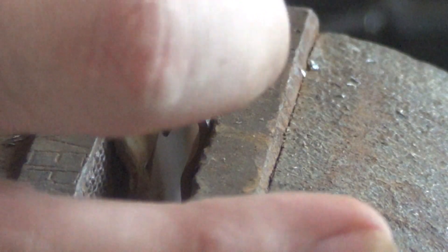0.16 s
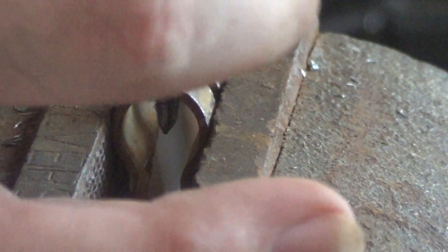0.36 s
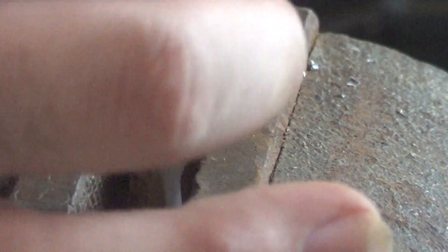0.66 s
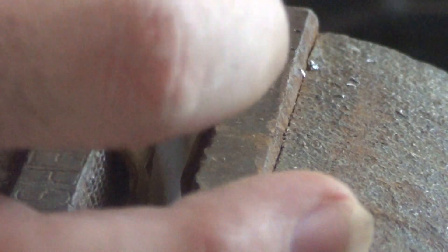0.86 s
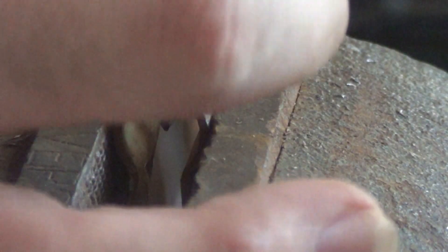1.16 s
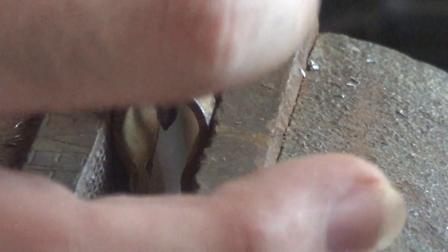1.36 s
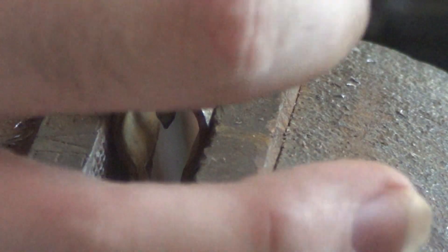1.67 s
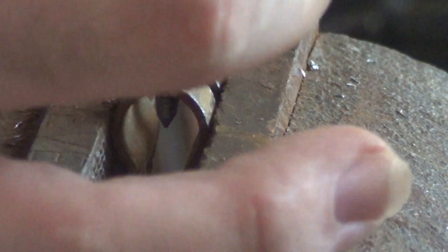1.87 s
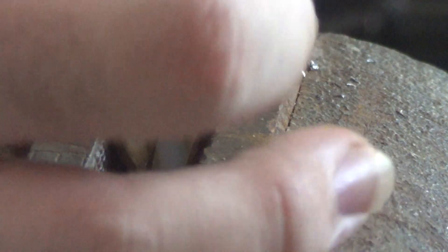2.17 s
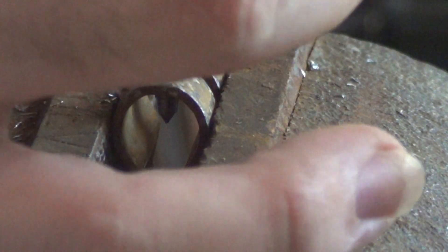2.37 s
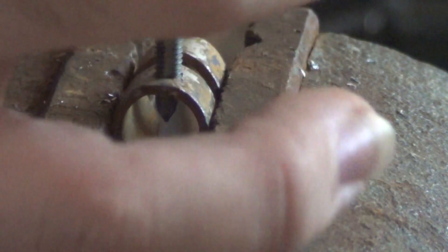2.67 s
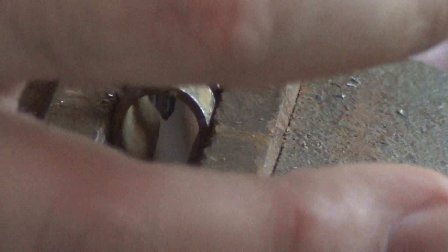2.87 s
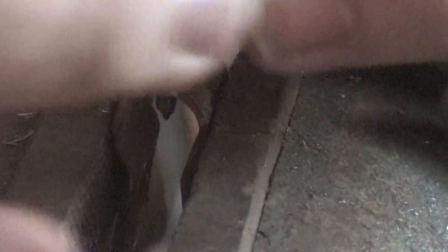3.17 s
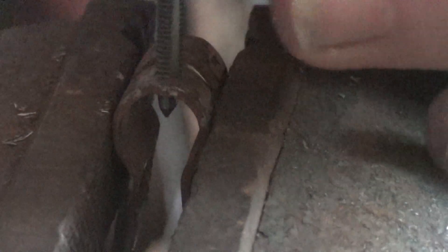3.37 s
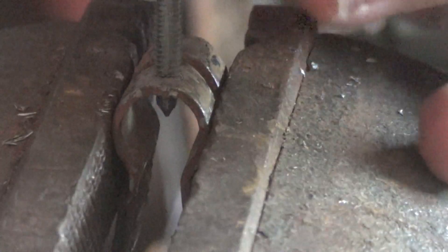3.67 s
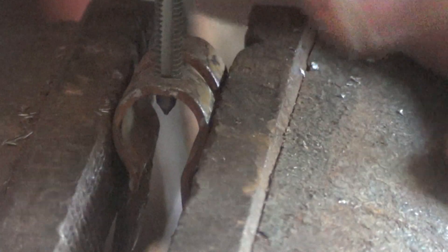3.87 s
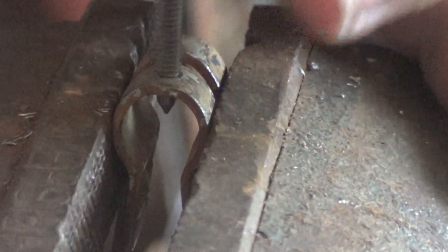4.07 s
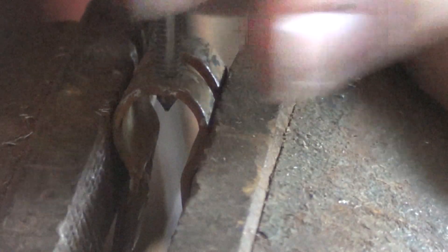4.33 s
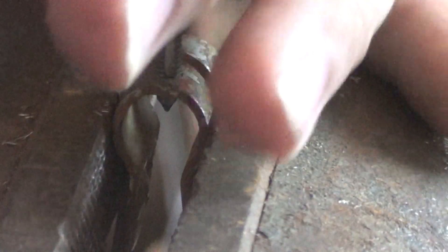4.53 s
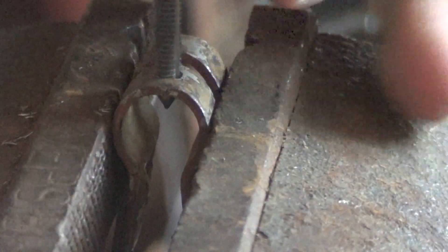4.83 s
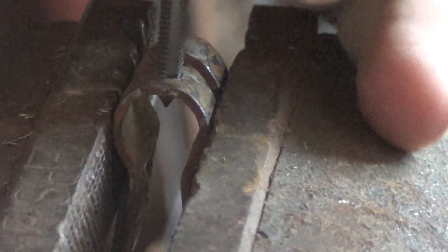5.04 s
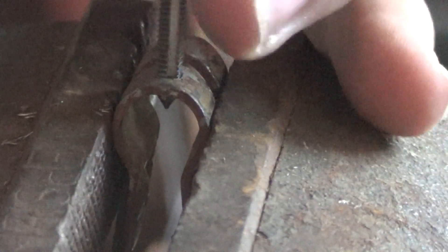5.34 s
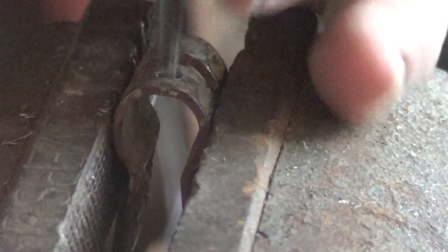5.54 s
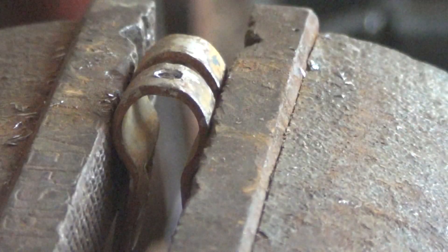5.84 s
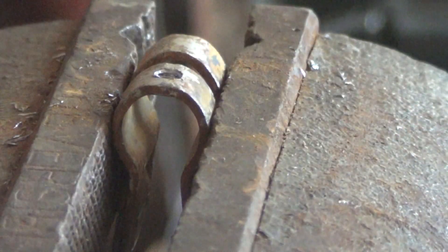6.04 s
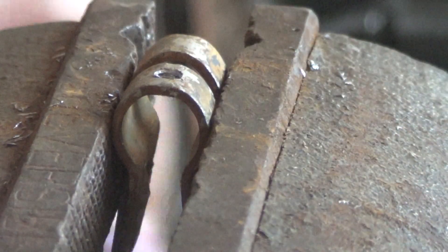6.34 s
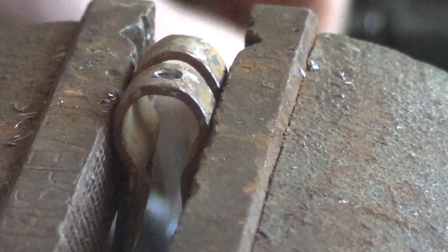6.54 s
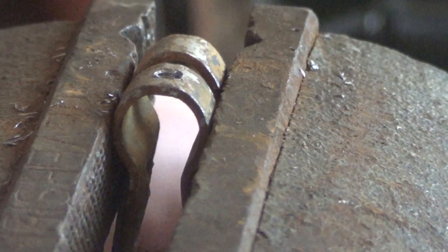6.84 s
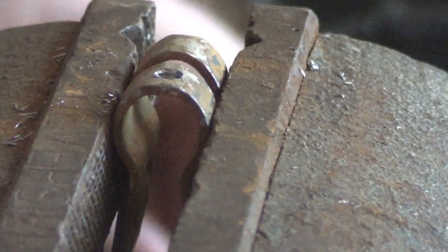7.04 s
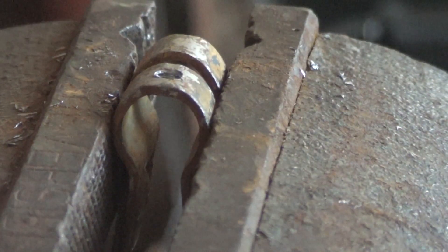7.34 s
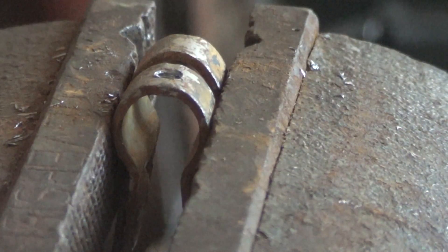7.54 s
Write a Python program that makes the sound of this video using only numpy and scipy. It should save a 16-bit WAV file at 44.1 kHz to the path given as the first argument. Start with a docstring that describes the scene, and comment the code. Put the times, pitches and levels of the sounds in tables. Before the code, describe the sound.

A thread tap is turned by hand in a steel clamp held in a vise, giving light, sharp, irregular clicks with a few gritty scrapes and faint creaks. Then the tool is knocked down on the bench, steel pieces clink brightly, and a bar is dragged briefly so that it rings. The microphone is close, in a small workshop with quiet room noise.

```python
"""Sharp steel clicks, close to the microphone in a small workshop: a thread tap is turned by hand out of
a clamp held in a vise, and its flutes catch and let go. Grit scrapes as the hands shift, and the thread
creaks as it sticks and slips. Then the tool is knocked down on the bench, steel pieces clink together,
and a bar is dragged along until it rings. Room noise and a thin electronic whine lie behind it all."""
import sys
import numpy as np
from scipy import signal
from scipy.fft import rfft, irfft
from scipy.io import wavfile
from scipy.ndimage import uniform_filter1d

SR = 44100
rng = np.random.default_rng(int(sys.argv[2]) if len(sys.argv) > 2 else 0)


def to_wav(sig):
    """Store sig (one row per channel, or 1-D mono) as 16-bit WAV at the path in sys.argv[1].

    Samples outside -1..1 are clipped; the rate is SR.
    """
    pcm = np.clip(np.atleast_2d(sig), -1, 1) * 32767
    pcm = np.round(pcm).astype(np.int16)
    wavfile.write(sys.argv[1], SR, pcm.T)  # frames by channels


N = 339657
TIME = np.arange(N) / SR


def from_db(db):
    """Decibels to gain."""
    return 10 ** (np.asarray(db) / 20)


def unit(x):
    """Scale to rms 1."""
    return x / np.sqrt(np.mean(x ** 2) + 1e-18)


def on_axis(points, hz):
    """Read (f/Hz, value) points on a log-frequency axis."""
    f, value = np.transpose(points)
    return np.interp(np.log(np.maximum(hz, 1)), np.log(f), value)


def colour(x, points, size=1024):
    """Minimum-phase filter of unit energy, shaped by (f/Hz, level/dB) points."""
    cepstrum = irfft(np.log(from_db(on_axis(points, np.fft.rfftfreq(size, 1 / SR)))))
    cepstrum[1:size // 2] *= 2
    cepstrum[size // 2 + 1:] = 0
    response = irfft(np.exp(rfft(cepstrum)))
    return signal.fftconvolve(x, response / np.linalg.norm(response))[:len(x)]


def resonate(x, hz, width_hz):
    """One resonance, gain 1 at its centre."""
    return signal.lfilter(*signal.iirpeak(hz, hz / width_hz, fs=SR), x)


def add(track, s, sound):
    """Mix a sound into a track from time s."""
    start = int(s * SR)
    track[start:start + len(sound)] += sound[:max(N - start, 0)]


def stroke(times, db, fade_s=0.0023):
    """Gain along a level curve, closing quickly outside it."""
    outside = np.maximum(times[0] - TIME, 0) + np.maximum(TIME - times[-1], 0)
    return from_db(np.interp(TIME, times, db)) * np.exp(-outside / fade_s)


def push(s, rise_s, fall_s, db, depth_db=11.5):
    """Gain of one push of the hand: it swells to its peak, then sags as the pressure eases."""
    corners = s + np.cumsum([0, rise_s, fall_s])
    return stroke(corners, [db - depth_db, db, db - depth_db])


def wander(rate):
    """A smooth random drift that takes a new course rate times a second."""
    knots = np.arange(0, TIME[-1] + 1 / rate, 1 / rate)
    zigzag = np.interp(TIME, knots, rng.standard_normal(N)[:len(knots)])
    return uniform_filter1d(zigzag, int(SR / rate / 2))


def chatter(decay_s):
    """One contact: a dying flurry of tiny impacts, of rms 1 at its start."""
    envelope = np.exp(-TIME[:SR // 4] / decay_s)
    flurry = envelope * rng.standard_normal(len(envelope))
    return flurry * np.linalg.norm(envelope) / np.linalg.norm(flurry)


def friction(rate, spread_db):
    """Random slips of uneven size, about rate a second, rms 1."""
    slipping = rng.random(N) < rate / SR
    size = from_db(spread_db * np.minimum(rng.exponential(size=N), 4))
    return unit(slipping * size * rng.standard_normal(N))


def ring(modes, detune, scatter_db):
    """Struck modes; the grip and the point of contact shift their pitch and share at every blow."""
    hz, db, t60 = np.transpose(modes)[:, :, None]
    shift, share, phase = rng.standard_normal((3, len(modes), 1))
    t = TIME[:SR // 4]
    gain = from_db(db + scatter_db * share)
    partials = np.sin(2 * np.pi * (hz * (1 + detune * shift) * t + phase))
    decay = np.exp(-np.log(1000) * t / t60)
    return (gain * partials * decay).sum(0) / np.linalg.norm(gain)


def strike(modes, contact, detune):
    """A flurry of impacts played through a set of modes, with the energy of one clean blow."""
    clean = ring(modes, detune, scatter_db=8.5)
    rough = signal.fftconvolve(contact, clean)[:len(clean)]
    return rough * np.linalg.norm(clean) / np.linalg.norm(rough)


def widen(mid, side, width):
    """Left and right from mid and side, with the side's level set by frequency."""
    side_gain = from_db(on_axis(width, np.fft.rfftfreq(len(side), 1 / SR)))
    side = irfft(rfft(side) * side_gain, len(side))
    return np.array([mid + side, mid - side])


# spectrum of the workshop's steady noise: f/Hz, level/dB
ROOM_TONE = [(25, -24), (50, -23), (80, -10.5), (125, -2.5), (200, -7), (300, 0), (430, -3.5), (800, -3.5),
             (1200, -6), (2000, -9.5), (4000, -9.5), (8000, -10.5), (13000, -25), (15500, -4)]
# narrow bands of hum and hiss: f/Hz, width/Hz, level/dB
NOISE_BANDS = [(408.4, 7.3, -69), (465.6, 18, -66.5), (642, 8.2, -67), (6600, 350, -69), (9980, 1350, -61),
               (10900, 930, -71)]
# slow swell of the midrange: t/s, relative level/dB
MID_SWELL = [(0.0, -56), (1.3, -60), (1.54, -50.5), (2.16, -64), (3.2, -52.5), (4.6, -53.5), (5.55, -49.5)]
# stereo width given to the background noise, near mono in the top treble: f/Hz, side level/dB
AIR_WIDTH = [(60, -14), (110, -19), (200, -5), (380, -6.5), (700, -2), (1290, -1.5), (2380, -3), (4400, -4),
             (8120, -7.5), (15000, -24)]

def background(floor_db=-51.5, swell_db=-4, whine_hz=15735, whine_db=-66):
    """All around the microphones: steady room noise, a swelling midrange and a thin electronic whine."""
    midrange = [(60, -16), (200, -10), (1000, 0), (2000, -2.5), (4000, -13), (9000, -19)]  # f/Hz, level/dB

    def air():
        noise = rng.standard_normal((3, N))
        steady = from_db(floor_db) * colour(noise[0], ROOM_TONE, size=4096)
        bands = sum(from_db(db) * unit(resonate(noise[1], hz, width)) for hz, width, db in NOISE_BANDS)
        swell = from_db(np.interp(TIME, *np.transpose(MID_SWELL)) + swell_db)
        return steady + bands + swell * colour(noise[2], midrange)
    whine = from_db(whine_db) * unit(np.sin(2 * np.pi * whine_hz * TIME))
    return widen(air(), air(), AIR_WIDTH) + whine


# reverberation time of the workshop: f/Hz, t60/s
WALL_DECAY = [(150, 0.59), (500, 0.87), (1400, 0.81), (3700, 0.84), (9000, 0.65), (15000, 0.35)]
# stereo width given to the echoes, near mono in the top treble: f/Hz, side level/dB
ECHO_WIDTH = [(100, -9), (300, -11), (700, -9.5), (1500, -8), (4000, -5), (8000, -7), (12000, -13),
              (15000, -34)]

def room_response(build_s=0.0028, treble_db=-3):
    """Reflections from the near walls build up, then die away at each band's own rate."""
    t, hz = TIME[:SR], np.fft.rfftfreq(SR, 1 / SR)
    centres = np.geomspace(100, 16000, 9)
    noise = rfft(rng.standard_normal((2, SR)))
    tail = np.zeros((2, SR))
    for centre, pick in zip(centres, np.eye(len(centres))):
        band = irfft(noise * on_axis(np.column_stack([centres, pick]), hz), SR)
        decay = np.exp(-np.log(1000) * t / on_axis(WALL_DECAY, centre))
        tail += band * from_db(treble_db * centre / centres[-2]) * decay
    tail *= 1 - np.exp(-t / build_s)
    return widen(*tail, ECHO_WIDTH) / np.linalg.norm(tail[0])


# skin brushes the turning shank: t/s, rise/s, fall/s, relative peak/dB
SKIN_BRUSHES = [(3.87, 0.082, .09, -44), (4.36, 0.033, .08, -49)]
# spectrum of skin on steel: f/Hz, level/dB
SKIN_COLOUR = [(4000, -30), (8000, -11), (10300, -1), (13000, -7), (15500, -11)]
# the hand presses on the wrench: t/s, rise/s, fall/s, relative peak/dB
HAND_PRESSES = [(4.26, 0.067, 0.22, -64), (4.72, .036, 0.25, -59), (5.13, .06, .13, -55.5),
                (5.49, 0.056, 0.11, -52)]

def fingers(brush_db=-2, press_db=-3):
    """Skin on steel gives a soft, high hiss; its pressure sends a dull rumble through the vise."""
    dull = [(50, -13), (110, -9), (170, 4.5), (260, 1.5), (600, -26), (3000, -52)]  # f/Hz, level/dB
    hiss = sum(push(*row) for row in SKIN_BRUSHES) * colour(rng.standard_normal(N), SKIN_COLOUR)
    rumble = sum(push(*row) for row in HAND_PRESSES) * colour(rng.standard_normal(N), dull, size=4096)
    return from_db(brush_db) * hiss + from_db(press_db) * rumble


# steel skids lightly over steel: t/s, rise/s, fall/s, relative peak/dB
STEEL_SKIDS = [(7.138, .004, 0.037, -28.5), (7.15, 0.034, 0.079, -22), (7.28, 0.053, 0.05, -36),
               (7.39, 0.083, .02, -31.5)]
# a steel bar is dragged along: t/s, relative level/dB
BAR_DRAG = [(7.43, -38), (7.478, -36), (7.508, -28.5), (7.645, -30), (7.7, -39)]
# spectra of the skid and the drag: f/Hz, level/dB
SKID_SPECTRUM = [(50, -29), (130, -24.5), (270, -9), (550, -10), (700, -5.5), (1300, -8.5), (2200, -8),
                 (4500, -11.5), (6800, -0.5), (8600, 2.5), (11000, -1.5), (15500, -12)]
DRAG_SPECTRUM = [(50, -26), (100, -30), (160, -9.5), (300, -4), (1000, 0), (1700, 3), (2600, 2), (4500, -2),
                 (7000, 2.5), (9000, 3), (11000, -1), (13000, -1), (15500, -12)]

def sliding_steel(skid_db=-2, rub_db=3):
    """Fine, dense slips make a light skid; coarser ones make the heavier drag that follows."""
    skid_gain = sum(push(*row) for row in STEEL_SKIDS)
    drag_gain = stroke(*np.transpose(BAR_DRAG))
    skid = skid_gain * colour(friction(rate=20000, spread_db=-1), SKID_SPECTRUM)
    rub = drag_gain * colour(friction(rate=9000, spread_db=2), DRAG_SPECTRUM)
    return from_db(skid_db) * skid + from_db(rub_db) * rub


# long modes of the dragged bar: f/Hz, relative level/dB, t60/s
BAR_RING = [(980, -5, 1.2), (1194, -11, .5), (1443, -11, .4), (1717, 2.5, .7), (1750, -8, .3),
            (2014, -8, .6), (2378, -12, .5), (2411, -13, .5), (2665, -14, .5), (4037, -13, .5),
            (4577, -9, 1), (6920, -10, 1), (8158, -15, .5), (10660, -13, .2), (12200, -15, .2)]

def singing_bar(sing_db=-1.5):
    """The drag feeds the bar's modes, which build up and sing unevenly."""
    power = stroke(*np.transpose(BAR_DRAG)) ** 2
    sing = np.zeros(N)
    for hz, db, t60 in BAR_RING:
        loss_rate = 2 * np.log(1000) / t60
        energy = signal.lfilter([loss_rate / SR], [1, loss_rate / SR - 1], power)
        # the slips push each mode off its size and phase; the more damped ones forget sooner
        gain = np.sqrt(energy) * from_db(db + 2 * wander(loss_rate))
        sing += gain * unit(np.sin(2 * np.pi * hz * TIME + wander(loss_rate)))
    return from_db(sing_db) * sing


# steel pieces clink together: t/s, relative level/dB, ring f/Hz, chatter decay/s
STEEL_CLINKS = [(6.4233, -12.5, 9440, 0.0046), (6.6675, -24, 7840, 0.022), (6.707, -15.5, 11000, 0.013),
                (6.7392, -13, 9000, 0.0039), (6.9747, -20, 8150, 0.0091), (7.1379, -5, 8840, 0.002),
                (7.1422, -8, 9000, 0.0028), (7.4626, -11.5, 11300, 0.0064), (7.5192, -13, 10800, 0.0027),
                (7.5496, -13, 10800, 0.0038), (7.5832, -9.5, 10100, 0.0019), (7.65, -10.5, 10900, 0.0028)]
# spectrum of the contact: f/Hz, level/dB
CLINK_COLOUR = [(500, -47), (2000, -4), (4500, -1), (7000, -3), (9500, 14), (12000, 8.5), (16000, -2)]

def clinks(crack_db=-6, ping_db=-7, width_hz=1500):
    """Hard steel contacts, each with its own short, high ring."""
    out = np.zeros(N)
    for s, db, hz, decay_s in STEEL_CLINKS:
        contact = chatter(decay_s)
        ping = resonate(resonate(contact, hz, width_hz), hz, 2 * width_hz)
        ping *= np.linalg.norm(contact) / np.linalg.norm(ping)
        crack = colour(contact, CLINK_COLOUR)
        add(out, s, from_db(db + crack_db) * crack + from_db(db + ping_db) * ping)
    return out


# the tool knocks on the bench: t/s, relative level/dB, low-pass f/Hz, thump decay/s
BENCH_KNOCKS = [(6.424, -32, 4750, 0.068), (6.531, -10, 1520, 0.014), (6.687, -13, 2460, 0.024),
                (6.709, -20, 4280, 0.03), (6.738, -21.5, 3250, 0.052), (6.757, -17.5, 540, 0.015),
                (7.138, -41, 4000, 0.0021)]
# spectrum of the thump: f/Hz, level/dB
THUMP_COLOUR = [(40, -26), (95, -30), (150, -14.5), (280, -9.5), (450, -4), (600, -3), (950, 0.5),
                (1400, -6), (1850, -2.5), (2400, -10), (4000, -9), (8000, -4), (15000, -38)]
# modes of the bench top: f/Hz, relative level/dB, t60/s
BOARD_MODES = [(415, 0, .09), (472, -1, .16), (574, -1, .12), (706, -2, .18), (810, -4, .12),
               (850, -3, .14), (955, -4, .1), (1058, -4, .14), (1180, -5, .14), (1700, -3, .1),
               (1805, -5, .1), (1955, -5, .12)]

def bench(knock_db=1.5, ring_db=-7):
    """Each knock on the bench top is a dense thump and a few short modes; softer contacts lose treble."""
    out = np.zeros(N)
    for s, db, top_hz, decay_s in BENCH_KNOCKS:
        thump = colour(chatter(decay_s), THUMP_COLOUR, size=4096)
        blow = thump + from_db(ring_db) * ring(BOARD_MODES, detune=.005, scatter_db=2)
        add(out, s, from_db(db + knock_db) * signal.lfilter(*signal.butter(2, top_hz, fs=SR), blow))
    # a high-pass keeps the knocks free of deep bass
    return signal.lfilter(*signal.butter(2, 125, "high", fs=SR), out)


# scrapes as the hands shift: t/s, rise/s, fall/s, relative peak/dB, rasp against hiss/dB
GRIT_SCRAPES = [(0.319, 0.017, 0.032, -31.5, -10), (0.413, 0.0054, 0.069, -19.5, -8.5),
                (0.655, 0.069, 0.074, -33.5, -9.5), (3.049, .004, 0.047, -27, -10),
                (3.1742, 0.0018, .028, -28, -1.5), (3.208, 0.019, .028, -33.5, -5.5),
                (5.827, .002, 0.078, -40.5, 2.5), (6.372, 0.0035, 0.073, -41.5, 0.5),
                (7.03, 0.078, .02, -37.5, -1.5), (7.31, 0.031, 0.05, -26, -1.5)]
# the biggest grains crack: t/s, relative level/dB
GRAIN_CRACKS = [(0.483, -21.5), (0.7041, -22.5), (0.707, -19.5), (3.0525, -33), (3.058, -17),
                (3.0719, -20.5), (5.827, -30), (5.839, -37), (6.2528, -28.5), (6.285, -28), (6.3764, -25.5)]
# spectra of the high hiss, the lower rasp and a crack: f/Hz, level/dB
HISS_COLOUR = [(60, -57), (2000, -16), (3800, -8), (5500, -7.5), (7200, -3), (8800, -4), (10500, -10.5),
               (13000, -16.5), (16000, -24)]
RASP_COLOUR = [(50, -30), (250, -14.5), (750, -6), (1050, 7), (1500, 6.5), (2400, 7), (3300, 2.5),
               (5000, -1.5), (9000, -7.5)]
CRACK_COLOUR = [(60, -52), (500, -17.5), (1500, -2.5), (4000, -4), (8000, 1.5), (12000, -13), (16000, -16)]

def scrapes(trim_db=-3):
    """Grit is ground under a sliding surface; the biggest grains crack one by one."""
    hiss_gain, rasp_gain, cracks = np.zeros((3, N))
    for s, rise_s, fall_s, db, rasp_db in GRIT_SCRAPES:
        gain = push(s, rise_s, fall_s, db)
        hiss_gain += gain
        rasp_gain += from_db(rasp_db) * gain
    for s, db in GRAIN_CRACKS:
        add(cracks, s, from_db(db) * chatter(decay_s=0.0015))
    hiss = colour(hiss_gain * friction(rate=9000, spread_db=1.6), HISS_COLOUR)
    rasp = colour(rasp_gain * friction(rate=5000, spread_db=1.6), RASP_COLOUR)
    return from_db(trim_db) * (hiss + rasp + colour(cracks, CRACK_COLOUR))


# the thread sticks and slips: t/s, rise/s, fall/s, relative peak/dB
THREAD_CREAKS = [(0.96, .05, 0.17, -48.5), (1.52, 0.016, 0.12, -49), (3.7, .095, 0.039, -38)]
# modes of the steel clamp: f/Hz, relative level/dB, t60/s
CLAMP_RING = [(1549, -18, 0.16), (1768, -5.5, 0.048), (1944, 2.5, 0.048), (1940, -7.5, 0.12),
              (2016, 1.5, 0.029)]

def creak(creak_db=-5):
    """Small slips of the turning thread keep the clamp ringing."""
    gain = sum(push(*row) for row in THREAD_CREAKS)
    slips = friction(rate=90, spread_db=2)
    clamp = ring(CLAMP_RING, detune=.003, scatter_db=0.5)
    return from_db(creak_db) * gain * unit(signal.fftconvolve(slips, clamp)[:N])


# a flute catches, levels relative: t/s, hold/s, bite/dB, release/dB, load on the tap/dB, vise thud/dB
FLUTE_CATCHES = [(0.259, .0106, -39, -31, -14, -52), (0.3652, 0.018, -26, -34, -10, -50),
                 (1.4044, 0.016, -29.5, -31, -14, -42.5), (1.8341, 0.0087, -27.5, -21.5, -1, -35),
                 (2.2326, .0158, -36, -22.5, -1.5, -41), (2.6302, 0.011, -22, -24.5, -0.5, -40),
                 (2.895, .0128, -32.5, -35, -44, -44.5), (2.9375, 0.0044, -32, -42, -45, -70),
                 (3.261, 0.011, -24.5, -24, -4, -50), (3.302, 0.0047, -30, -42, -11.5, -51),
                 (3.33, 0.018, -28.5, -25, -11, -55), (3.5027, 0.0076, -33.5, -43, -52, -63),
                 (3.6526, .0182, -32, -35, -15.5, -62), (3.6986, 0.012, -34, -30.5, -10.5, -65),
                 (3.7335, 0.023, -29.5, -41, -16, -58), (3.7753, 0.016, -26, -33, -3, -52),
                 (3.8034, .0132, -28.5, -34, -26, -46), (4.0775, 0.0051, -37.5, -35, -13.5, -45),
                 (4.1977, .0061, -27, -28.5, -8, -39), (4.336, .0101, -30.5, -35.5, -10.5, -48),
                 (4.7155, 0.02, -32, -32, -7.5, -45), (4.828, .0137, -35, -20, -4, -50),
                 (4.952, 0.0047, -32, -54, -10.5, -58), (5.434, 0.018, -37, -31, -14.5, -53),
                 (5.5612, 0.02, -28, -27.5, -8.5, -46)]
# spectrum of a flute's tick: f/Hz, level/dB
TICK_COLOUR = [(60, -45), (500, -27), (2000, -13), (3300, -12), (4300, -16), (6300, -8), (7800, -11),
               (9200, 0), (10600, -1), (11700, -8), (13000, -3), (14500, -11), (16000, -15)]
# modes of the tap, the jaws and the vise: f/Hz, relative level/dB, t60/s
TAP_RING = [(2380, -2, .025), (2630, 0, .028), (2790, -1, .025), (2920, -3, .02), (3060, -2, .03),
            (3200, -4, .025), (3450, -6, .022), (4750, -13, .015), (5680, -9, .018), (6290, -7, .015),
            (6750, -9, .015)]
JAW_RING = [(1023, 7, 0.062), (1142, -10.5, 0.15), (1370, -10, 0.034)]
VISE_RING = [(343, 0, 0.11), (374, -1.5, 0.17), (475, -8, 0.038), (727, -11, 0.13)]

def tap(tick_db=-4, thud_db=-5, tick_s=0.0044, crunch_s=0.0094, settle_s=0.018, settle_db=-9.5):
    """Close up, a flute bites, lets go and settles; each slip ticks and rings tap, clamp and jaws."""
    ticks, body = np.zeros((2, N))
    # modes, level at full load/dB, dB per dB of load, detune
    parts = [(TAP_RING, -26, 1, .012), (CLAMP_RING, -31, 1, .01), (JAW_RING, -43, .25, .02)]
    for s, hold_s, bite_db, release_db, load_db, vise_db in FLUTE_CATCHES:
        slips = [(s, bite_db), (s + hold_s, release_db), (s + hold_s + settle_s, release_db + settle_db)]
        for at, db in slips:
            add(ticks, at, from_db(db + tick_db) * chatter(tick_s))
            share_db = 0.41 * (db - max(bite_db, release_db))  # a weaker slip rings less
            for modes, full_db, slope, detune in parts:
                crunch = strike(modes, chatter(crunch_s), detune)
                add(body, at, from_db(full_db + slope * load_db + share_db) * crunch)
        for at, _ in slips[1:]:  # letting go shakes the vise
            thud = strike(VISE_RING, chatter(crunch_s), detune=.025)
            add(body, at, from_db(vise_db + thud_db) * thud)
    # a high-pass keeps the clicks free of low thump
    body = signal.lfilter(*signal.butter(2, 220, "high", fs=SR), body)
    return colour(ticks, TICK_COLOUR), body


def scene(early_db=-16):
    """A microphone pair close to the vise hears each source directly and off the workshop's walls."""
    ticks, body = tap()
    # sound, room send/dB, left minus right/dB
    sources = [(ticks + fingers(), -12, 1),
               (body + creak(), -10, .3),
               (scrapes(), -9, 1.7),
               (bench(), -7, -.6),
               (clinks(), -7, .5),
               (sliding_steel(), -4, .9),
               (singing_bar(), -12, .5)]
    direct = sum(x * from_db([[pan_db / 2], [-pan_db / 2]]) for x, _, pan_db in sources)
    sent = sum(x * from_db(room_db) for x, room_db, _ in sources)
    # the vise and bench throw back early reflections that differ between left and right
    near = chatter(decay_s=0.0013)
    early = from_db(early_db) * signal.fftconvolve(direct.mean(0), near / np.linalg.norm(near))[:N]
    echoes = signal.fftconvolve(sent[None], room_response(), axes=1)[:, :N]
    return direct + np.array([early, -early]) + echoes + background()


def record(dry):
    """The recorder cuts the treble steeply above 15.9 kHz."""
    return signal.sosfilt(signal.ellip(10, .2, 70, 15900, fs=SR, output="sos"), dry)


dry = scene()
out = record(dry)
to_wav(out)
```